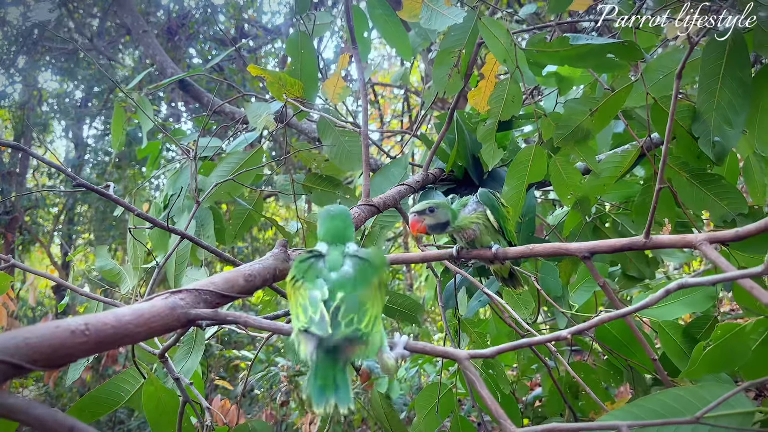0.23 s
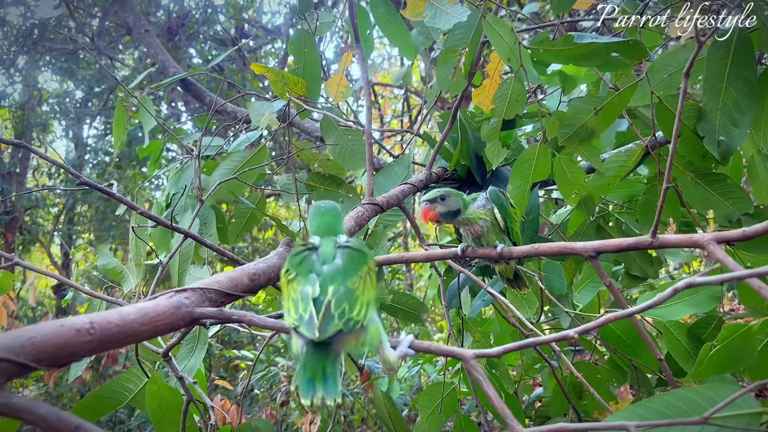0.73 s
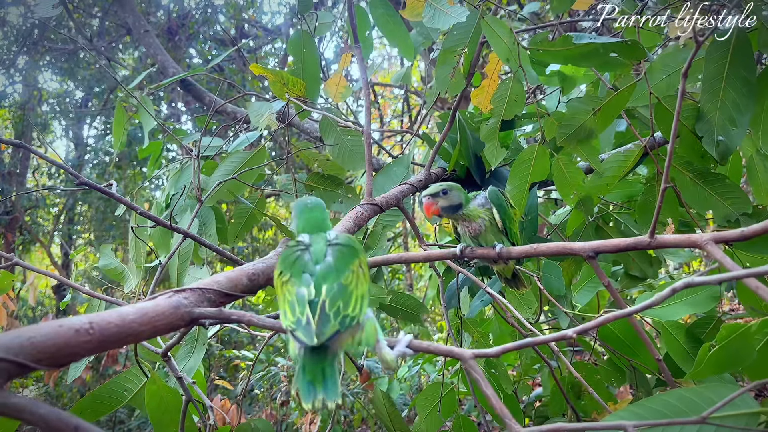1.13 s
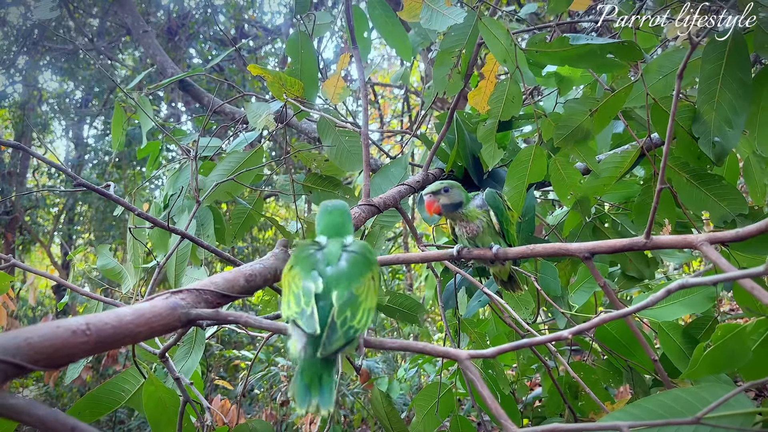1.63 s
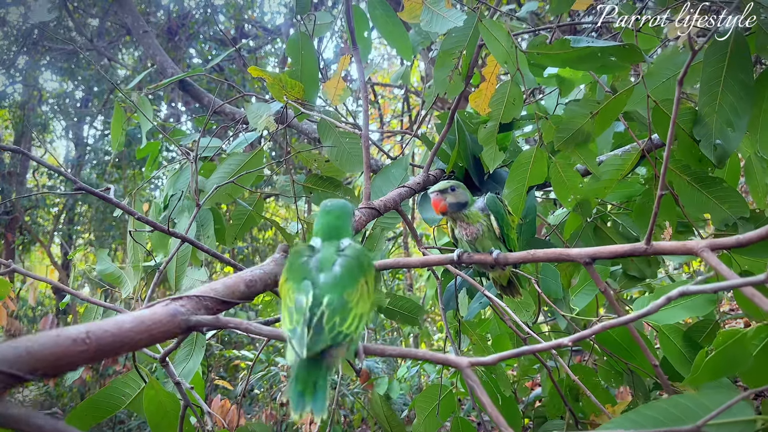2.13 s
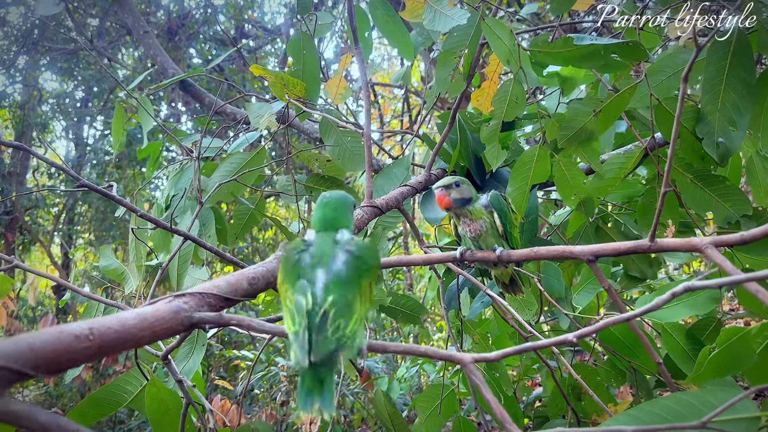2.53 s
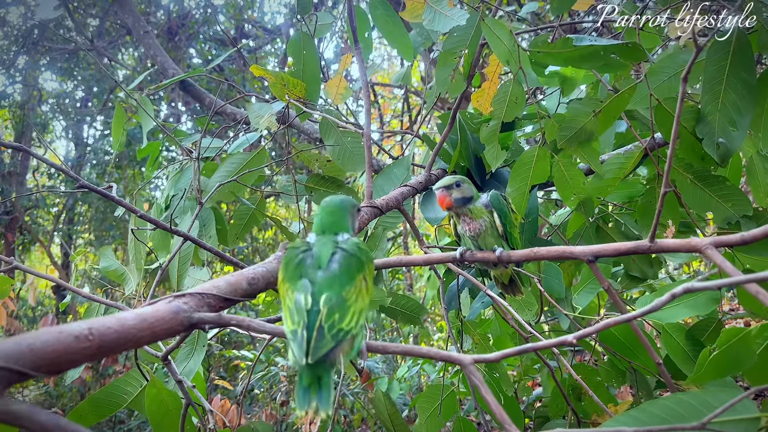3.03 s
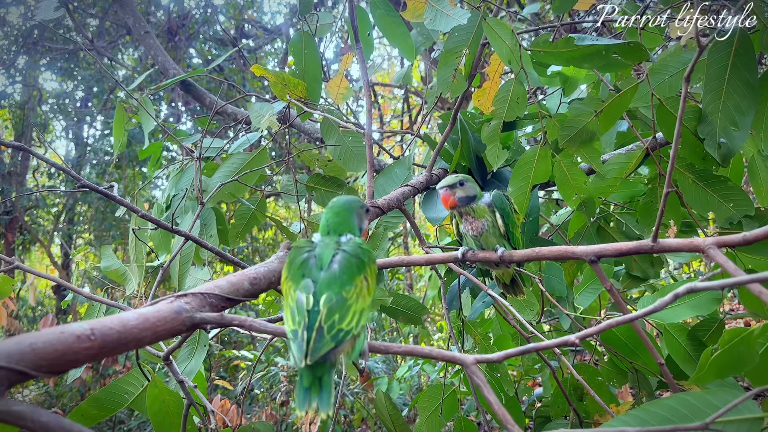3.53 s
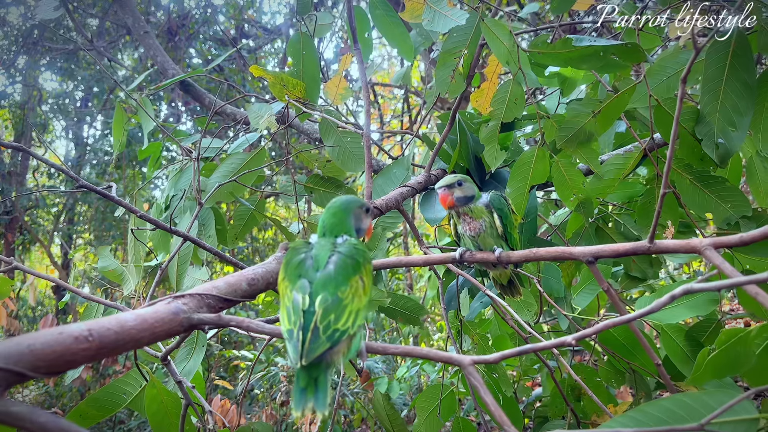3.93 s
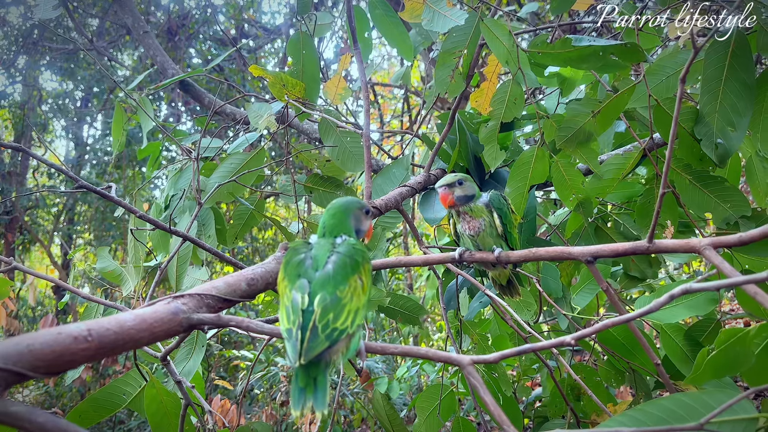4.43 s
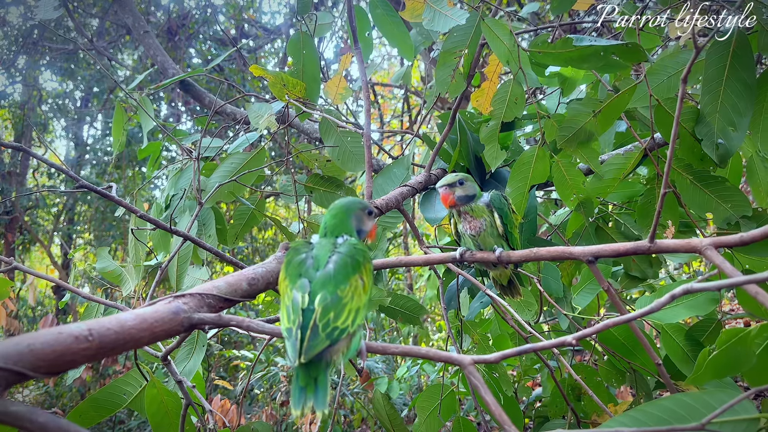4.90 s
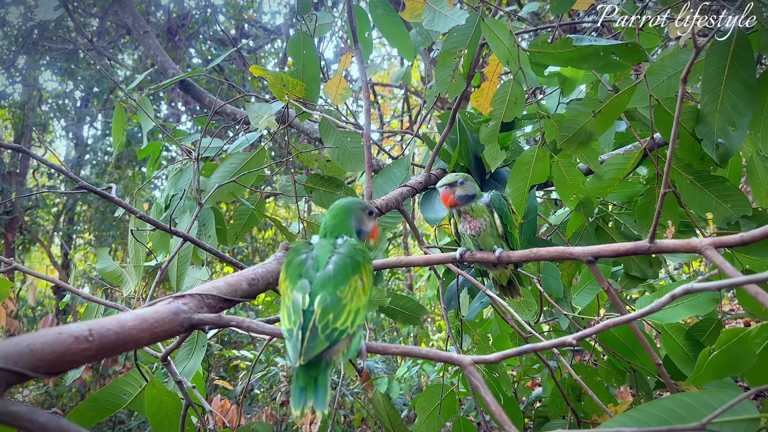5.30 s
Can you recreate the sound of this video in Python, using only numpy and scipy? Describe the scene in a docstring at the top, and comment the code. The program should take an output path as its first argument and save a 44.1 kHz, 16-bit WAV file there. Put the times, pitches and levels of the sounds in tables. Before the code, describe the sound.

A bird flaps and clambers in a leafy tree, snapping twigs and rustling leaves, with faint chirps and whistles behind.

```python
"""In a leafy forest tree, parakeets perch while another flaps in, lands close by and clambers about.
Twigs snap in a spray of fibre slips and ring briefly; feet and feathers scuff and rustle stiff leaves.
The shaken branch flutters low and gives dull thuds where feet and wings strike it.
Behind it the forest hisses softly, with thin chirps, lisping calls and two far, gliding whistles."""
import sys
import numpy as np
from scipy import signal
from scipy.fft import rfft, irfft, next_fast_len
from scipy.io import wavfile
from scipy.ndimage import uniform_filter1d

SR = 44100
rng = np.random.default_rng(int(sys.argv[2]) if len(sys.argv) > 2 else 0)


def log_audio(samples):
    """Write samples as a 16-bit WAV file to the path given in sys.argv[1]."""
    # one column per channel
    frames = np.atleast_2d(samples).T
    # limit to full scale, then quantise
    limited = np.clip(frames, -1, 1)
    pcm = np.round(limited * 32767).astype(np.int16)
    wavfile.write(sys.argv[1], SR, pcm)


N = 245195
TIME = np.arange(N) / SR
LANDING_S = 1.63
WOOD_EDGE_HZ, CRISP_EDGE_HZ, CUTOFF_HZ = 3340, 9160, 15900   # upper edges of lows, mids and crisp top

# EQ of the forest at rest: f/Hz, relative level/dB
FOREST_EQ = [(25, -20), (60, 8), (100, 1), (160, -7), (300, -8.5), (600, -11), (1000, -7.5), (2300, -3.5),
             (3800, -4.5), (5000, -3), (6200, -9.5), (8500, -21), (12000, -28.5), (16000, -30)]
# EQ of sliding leaves: f/Hz, relative level/dB
LEAF_EQ = [(120, -13.5), (220, 0.5), (700, -4), (1900, -0.5), (3500, -9.5), (5000, 2.5), (5800, -5),
           (6800, 3), (8500, -10), (11000, -61)]
# how hard the bird stirs the foliage: t/s, relative level/dB
STIRRING = [(1.15, -60), (1.27, -58), (1.6, -56), (1.82, -50.5), (2.02, -53), (2.14, -53), (2.44, -54),
            (2.93, -52), (3.23, -53.5), (3.5, -54), (4.01, -53), (4.18, -56.5)]
# wings and tail sweep along the leaves: centre t/s, level/dB, half-length/s, crisp top/dB
WING_SWEEPS = [(0.212, -66.5, 0.019, -2.5), (1.19, -58, 0.0081, -5), (1.483, -65, 0.057, 7),
               (1.776, -47.5, 0.11, -8), (1.847, -41.5, 0.027, -2.5), (2.134, -46, 0.031, -5),
               (3.805, -55, 0.01, -25), (4.07, -52, 0.032, -8), (4.128, -60, 0.044, -3.5),
               (4.262, -56.5, 0.014, -9), (4.35, -67.5, 0.091, -3), (4.53, -68.5, 0.14, -2),
               (4.996, -63, 0.03, -8), (5.405, -65, 0.11, -4.5)]
# two far whistles, one curve each: t/s, f/Hz, level/dB
WHISTLE_CURVES = [
    [(0.24, 1017, -74), (0.35, 1120, -73), (0.42, 1110, -71), (0.47, 990, -71)],
    [(4.955, 1163, -65), (5.03, 1076, -69), (5.16, 1114, -57), (5.24, 1194, -54.5), (5.31, 1336, -61),
     (5.37, 1405, -59.5), (5.425, 1200, -56.5), (5.475, 1050, -70), (5.54, 867, -70)],
]
# thin chirps: t/s, length/s, middle f/Hz, glide/Hz, level before flicker/dB
THIN_CHIRPS = [(0.255, 0.068, 14200, -11, -74), (0.28, .13, 12600, 208, -77),
               (0.317, .12, 11300, -800, -80), (0.343, .1, 13900, -650, -73),
               (0.495, .06, 13400, -600, -75), (4.828, 0.12, 14050, 700, -74),
               (4.824, .17, 7030, 351.5, -67)]
# far lisping calls, blurred by the trees: t/s, level/dB, f/Hz, t60/s
LISP_CALLS = [(0.4, -57.5, 6600, 0.37), (0.645, -62, 6500, .6), (0.714, -63.5, 6700, 0.47),
              (0.758, -65, 5460, .4), (4.485, -61.5, 6450, 0.83), (4.52, -62, 5530, 0.42)]
# EQ of cracking foliage: f/Hz, relative level/dB
CRACK_EQ = [(100, -16.5), (300, 4), (700, 2.5), (1400, 7), (2200, 7), (3200, -2), (4600, 3), (6800, 7),
            (7600, 1), (8700, -11.5), (10500, 0.5), (15500, -5.5)]
# twigs snap: t/s, level/dB, t60/s, twig f/Hz, crisp top before lift/dB
TWIG_SNAPS = [(1.4675, -24.5, 0.024, 5230, -4.5), (1.4675, -25.5, 0.007, 1550, 0),
              (1.6389, -31.5, 0.017, 1560, -13), (1.641, -27.5, 0.0043, 4430, -18),
              (1.6396, -35, 0.02, 600, -11), (1.6621, -26.5, 0.012, 6800, -20),
              (1.7503, -17.5, 0.0037, 2100, -8), (1.75, -42, .01, 4700, -2),
              (1.7579, -28.5, 0.01, 2300, -11), (1.7797, -33, 0.0056, 2900, -20),
              (1.781, -23, 0.012, 4640, -18), (1.8086, -28, 0.0069, 4150, -15),
              (1.8125, -31, 0.021, 2480, -18), (1.8402, -19.5, 0.0087, 1370, -3),
              (1.955, -40.5, 0.02, 1300, -16), (2.011, -42, 0.024, 6760, -15),
              (2.3422, -38.5, 0.033, 1650, -6), (2.3665, -38.5, 0.046, 1950, -6),
              (2.378, -33.5, 0.012, 1720, -7), (2.4653, -32, 0.025, 2500, -2.5),
              (2.7515, -33, 0.027, 2270, -6), (2.758, -34.5, 0.021, 2720, -18),
              (2.7655, -33.5, 0.035, 1970, -15), (2.577, -42.5, 0.0074, 1120, -5),
              (2.994, -38, .011, 4400, -10), (3.0092, -41, .008, 1990, -8), (3.0538, -38, .011, 3000, -22),
              (3.1118, -31.5, 0.027, 4900, -4.5), (3.1478, -29, 0.016, 6500, 0.5),
              (3.151, -34, 0.015, 4230, -10), (3.1907, -36, 0.0068, 7450, -12),
              (3.2058, -39, 0.016, 2740, -3), (3.2655, -41, .013, 4650, -5),
              (3.3787, -35.5, 0.018, 5420, -13), (3.4426, -38, 0.012, 1900, -10),
              (3.629, -42, .008, 6300, -20), (3.6875, -36.5, 0.029, 4400, -22),
              (3.8431, -24, 0.0066, 6270, -13.5), (3.9115, -32.5, 0.012, 6200, -22),
              (3.9838, -35, 0.023, 5340, -1), (4.0371, -25.5, 0.0041, 7400, 3),
              (4.0883, -37, 0.0086, 6040, -4), (5.551, -32.5, 0.025, 6860, -4)]
# EQ of the fluttering branch: f/Hz, relative level/dB
BRANCH_EQ = [(25, -13), (60, 4.5), (140, -4), (220, -8.5), (400, -16.5), (700, -17), (1100, -38.5)]
# thuds on the branch: t/s, peak level/dB, f/Hz, t60/s
BRANCH_THUDS = [(1.729, -35, 75, 0.064), (1.755, -31.5, 200, 0.027), (1.806, -35, 130, .05),
                (1.842, -21.5, 157, 0.023), (1.904, -34.5, 96, .054), (2.194, -35, 101, 0.034),
                (2.418, -29.5, 200, 0.011), (2.521, -32.5, 142, 0.014), (2.599, -34.5, 111, 0.021),
                (2.807, -36.5, 66.6, 0.047), (3.157, -40.5, 114, 0.039), (3.495, -39, 94, 0.059),
                (3.548, -44, 84.5, 0.089), (4.989, -55.5, 192, .052)]
# feet and feathers scuff stiff leaves: t/s, level/dB, woody lows/dB
LEAF_SCUFFS = [(1.665, -41, 8), (1.722, -38.5, 11), (1.7602, -36, 14), (1.8327, -40, 8),
               (1.8444, -31.5, 1.5), (2.0414, -42.5, -5), (2.2183, -40.5, 1), (2.4155, -37, -1.5),
               (2.4776, -39, -5), (2.6273, -43.5, -1), (2.6476, -40.5, 3.5), (2.711, -42.5, -1.5),
               (2.8108, -37, -1.5), (2.856, -38.5, 11), (3.027, -42.5, -2), (3.116, -46, -2),
               (3.324, -35, -9), (3.368, -38.5, 1), (3.4839, -41.5, -2.5), (3.499, -41.5, 0.5),
               (3.532, -43.5, -3), (3.5632, -45, -1), (3.6723, -42, 2), (3.715, -40.5, -4.5),
               (3.8585, -43, -28), (4.0573, -49, 3), (4.073, -44.5, 11), (4.2428, -49.5, -5)]


def from_db(db):
    """Decibels to gain."""
    return 10 ** (np.asarray(db) / 20)


def rms_one(x):
    """Scale to unit rms."""
    return x / np.sqrt(np.mean(x ** 2) + 1e-20)


def fader(times, db):
    """Gain along a dB curve, fading to silence outside it."""
    return uniform_filter1d(from_db(np.interp(TIME, times, db, left=-120, right=-120)), SR // 200)


def hit_envelope(start, db, t60, rise_s):
    """Gain with a quick attack and an exponential decay."""
    t = np.maximum(TIME - start, 0)
    return from_db(db - np.minimum(60 * t / t60, 120)) * (1 - np.exp(-t / rise_s))


def band(x, hz, kind, order=2):
    """Butterworth filter."""
    return signal.sosfilt(signal.butter(order, np.clip(hz, 10, .45 * SR), kind, fs=SR, output="sos"), x)


def equalise(x, curve):
    """Minimum-phase EQ along a curve; white noise keeps its power."""
    size = 2 * next_fast_len(N // 2 + 4096)
    hz, db = np.transpose(curve)
    bin_hz = np.linspace(1, SR / 2, size // 2 + 1)
    gain = rms_one(from_db(np.interp(np.log(bin_hz), np.log(hz), db)))
    cepstrum = irfft(np.log(gain))
    cepstrum[1:size // 2] *= 2
    cepstrum[size // 2 + 1:] = 0
    return irfft(rfft(x, size) * np.exp(rfft(cepstrum)))[:N]


def drift(per_s):
    """Smooth random wander; rms 1."""
    return rms_one(np.interp(TIME * per_s, np.arange(8192), rng.standard_normal(8192)))


def add(out, start, sound):
    """Mix a sound in at its cue."""
    i = int(start * SR)
    out[i:i + len(sound)] += sound[:max(N - i, 0)]


def forest_hiss(level_db=-61, wander_db=0.49):
    """The forest at rest: a soft noise bed whose level wavers slightly."""
    return from_db(level_db + wander_db * drift(31)) * equalise(rng.standard_normal(N), FOREST_EQ)


def crackle(clump_db, clumps_per_s, spiky_db):
    """Tiny slips of uneven size that come in clumps; rms 1."""
    sizes = from_db(spiky_db * np.minimum(rng.exponential(1, N), 5))
    slips = rng.standard_normal(N) * sizes
    clumps = from_db(clump_db * np.clip(drift(clumps_per_s), -2, 2))
    return rms_one(slips * clumps)


def leaf_ticks(per_s=300, cycles=16, spread_db=6.5, count=18):
    """Single leaves flick at random, each ringing for a few cycles at a pitch of its own; rms 1."""
    flicks = (rng.random(N) < per_s / SR) * from_db(spread_db * np.minimum(rng.exponential(1, N), 2))
    leaf, out = rng.integers(0, count, N), np.zeros(N)
    for k, hz in enumerate(np.linspace(1400, 7600, count)):
        radius, angle = from_db(-60 * hz / (cycles * SR)), 2 * np.pi * hz / SR
        feed = [0, np.sin(angle) * np.sqrt(1 - radius ** 2)]
        feedback = [1, -2 * radius * np.cos(angle), radius ** 2]
        out += signal.lfilter(feed, feedback, flicks * (leaf == k) + 1e-18)
    return rms_one(out)


def rustle_db(t, loudest_db=-54, expansion=1.78):
    """The rustle grows steeply with the stirring."""
    times, db = np.transpose(STIRRING)
    return loudest_db + expansion * (np.interp(t, times, db) - db.max())


def rustle(tick_db=-2.5, crisp_db=-6.5):
    """Leaves and feathers slide over each other in tiny slips, swelling with each wing sweep."""
    slips = crackle(clump_db=3.5, clumps_per_s=170, spiky_db=3.5)
    body = rms_one(equalise(slips, LEAF_EQ)) + from_db(tick_db) * leaf_ticks()
    top = rms_one(band(slips, [CRISP_EDGE_HZ, CUTOFF_HZ], "band", order=3))
    times = np.transpose(STIRRING)[0]
    out = fader(times, rustle_db(times)) * (body + from_db(crisp_db) * top)
    for centre, db, half_length, top_db in WING_SWEEPS:
        swell = np.exp(-2 * np.minimum(((TIME - centre) / half_length) ** 2, 20))
        out += from_db(db) * swell * (body + from_db(top_db) * top)
    return out


def tree_reverb(x, wet_db, t60, dull_hz):
    """Trunks and leaves scatter a faint, dull tail."""
    t = TIME[:SR]
    tail = band(rng.standard_normal(SR), dull_hz, "low") * from_db(-60 * t / t60) * (t > .003)
    return x + from_db(wet_db) * signal.fftconvolve(x, tail / np.sqrt(np.sum(tail ** 2)))[:N]


def bird_tone(times, hz, db, waver=.004):
    """A bird glides through a nearly pure tone."""
    pitch = uniform_filter1d(np.interp(TIME, times, hz), SR // 50) * (1 + waver * drift(150))
    return fader(times, db) * np.sin(2 * np.pi * np.cumsum(pitch) / SR)


def whistles():
    """Slow whistles that climb and fall away."""
    return sum(bird_tone(*np.transpose(call)) for call in WHISTLE_CURVES)


def chirps(arch_hz=151, fade_db=5.0, flicker_db=3.5):
    """Each chirp's glide bows upward and is loudest in the middle; the level flickers."""
    out, u = np.zeros(N), np.linspace(-1, 1, 9)   # u runs from a chirp's start to its end
    for start, length, hz, glide, db in THIN_CHIRPS:
        pitch = hz + glide * u / 2 - arch_hz * u ** 2
        out += bird_tone(start + length * (u + 1) / 2, pitch, db - fade_db * u ** 2)
    return out * from_db(flicker_db * (drift(60) - 0.5))


def lisps(half_width_hz=450, rise_s=0.0025):
    """Short high calls reach the tree as narrow, fading bands of hiss."""
    out, t = np.zeros(N), TIME[:SR // 2]
    for start, db, hz, t60 in LISP_CALLS:
        hiss = rms_one(band(rng.standard_normal(len(t)), [hz - half_width_hz, hz + half_width_hz], "band"))
        add(out, start, hiss * from_db(db - 60 * t / t60) * (1 - np.exp(-t / rise_s)))
    return out


def fibre_slips():
    """The crackle of breaking foliage, split into woody lows, mids and crisp top."""
    slips = equalise(crackle(clump_db=3.0, clumps_per_s=880, spiky_db=1.0), CRACK_EQ)
    return (band(slips, WOOD_EDGE_HZ, "low", order=4),
            band(slips, [WOOD_EDGE_HZ, CRISP_EDGE_HZ], "band", order=3),
            band(slips, CRISP_EDGE_HZ, "high", order=4))


def wood_rings(blows):
    """Wood rings as one damped sine for each blow."""
    out, t = np.zeros(N), TIME[:SR // 4]
    for start, db, hz, t60 in blows:
        add(out, start, from_db(db - 60 * t / t60) * np.sin(2 * np.pi * hz * t))
    return out


def snaps(rise_share=0.014, top_lift_db=4.5, ring_db=-3.5, ring_t60=.012, woody_below_hz=3040):
    """Each break is a dying spray of fibre slips and a ring; thick twigs ring lower and sound woodier."""
    out, twigs = np.zeros(N), []
    lows, mids, tops = fibre_slips()
    for start, db, t60, hz, top_db in TWIG_SNAPS + stalk_cues():
        part = slice(int(start * SR), int(start * SR) + SR // 6)
        woody_db = 6 * np.log2(woody_below_hz / hz)   # 6 dB more lows per octave down
        spray = from_db(woody_db) * lows[part] + mids[part] + from_db(top_db + top_lift_db) * tops[part]
        t = TIME[:len(spray)]
        decay = from_db(-60 * t / t60)
        burst = spray * decay * (1 - np.exp(-t / (rise_share * t60)))
        add(out, start, from_db(db) * rms_one(burst) * np.sqrt(np.mean(decay ** 2)))
        twig_db = db + ring_db + 10 * np.log10(t60 / ring_t60)   # a constant share of the snap's energy
        twigs.append((start, twig_db, hz, ring_t60))
    return out + wood_rings(twigs)


def stalk_cues(above_rustle_db=13.5, t60=0.01, top_db=-3.0, count=20):
    """Thin stalks give way at random as the bird clambers, louder as it stirs; rows like TWIG_SNAPS."""
    when, pitch = rng.random((count, 2)).T
    times = LANDING_S + when * (STIRRING[-1][0] - LANDING_S)
    pitches = np.interp(pitch, [0, 1], [1400, 7400])
    return [(t, rustle_db(t) + above_rustle_db, t60, hz, top_db) for t, hz in zip(times, pitches)]


def branch(sway_db=-53, settle_db_per_s=8, jolt_db=-18.5, jolt_t60=0.39, rise_s=0.0081):
    """The branch flutters from the landing on, and thuds and shakes anew where feet and wings strike."""
    flutter = rms_one(equalise(rng.standard_normal(N), BRANCH_EQ))
    sway = hit_envelope(LANDING_S, sway_db, 60 / settle_db_per_s, rise_s)
    jolt_power = sum(hit_envelope(start, db + jolt_db, jolt_t60, rise_s) ** 2
                     for start, db, _, _ in BRANCH_THUDS)
    return np.sqrt(sway ** 2 + jolt_power) * flutter + wood_rings(BRANCH_THUDS)


def scuffs(t60=0.057, rise_s=0.00056, top_db=-4):
    """A scuffed leaf crackles longer and more softly than a twig, and does not ring."""
    lows, mids, tops = fibre_slips()
    leaf = mids + from_db(top_db) * tops
    return sum(hit_envelope(start, db, t60, rise_s) * rms_one(leaf + from_db(woody_db) * lows)
               for start, db, woody_db in LEAF_SCUFFS)


def scene():
    """Mono mix: the tree up close, far birds behind it, the forest bed underneath."""
    near = tree_reverb(snaps() + scuffs() + rustle(), wet_db=-17.5, t60=0.31, dull_hz=7440) + branch()
    far = tree_reverb(whistles() + chirps(), wet_db=-14, t60=0.74, dull_hz=8000) + lisps()
    return (near + far + forest_hiss())[None]


def record(dry):
    """Master EQ: a rumble filter and a steep high cut."""
    high_cut = signal.ellip(10, .1, 80, CUTOFF_HZ, fs=SR, output="sos")
    return signal.sosfilt(high_cut, band(dry, 44.5, "high", order=5))


dry = scene()
out = record(dry)
log_audio(out)
```